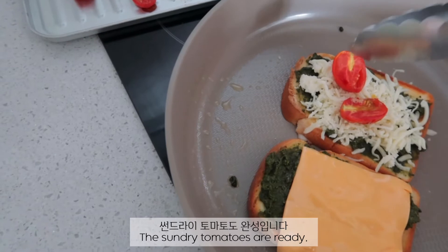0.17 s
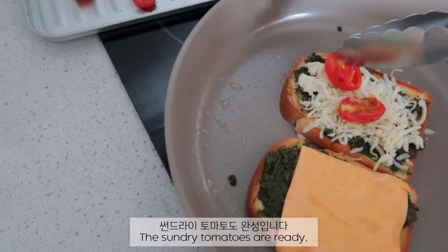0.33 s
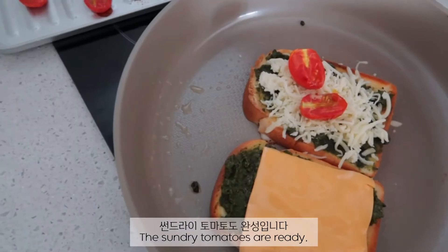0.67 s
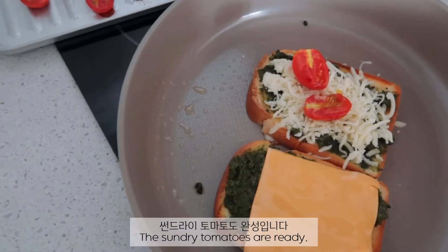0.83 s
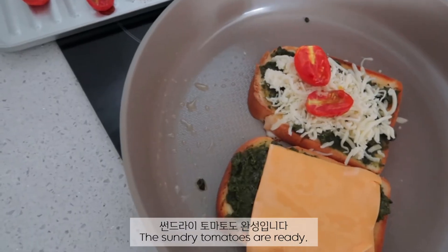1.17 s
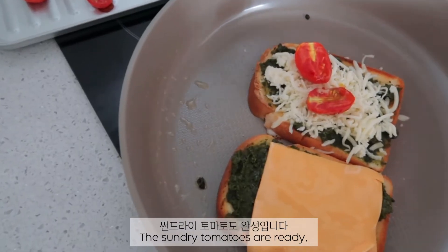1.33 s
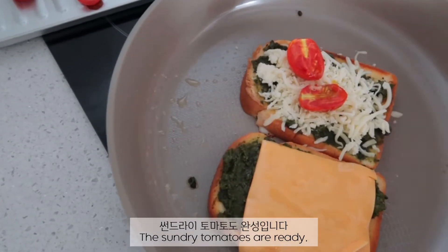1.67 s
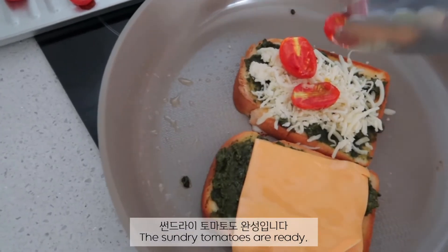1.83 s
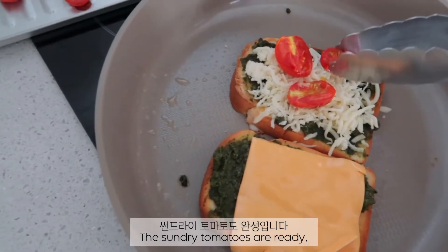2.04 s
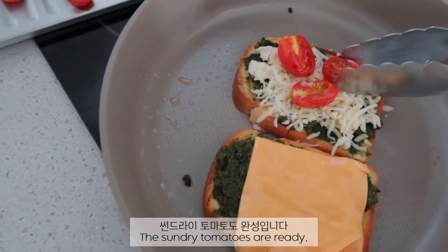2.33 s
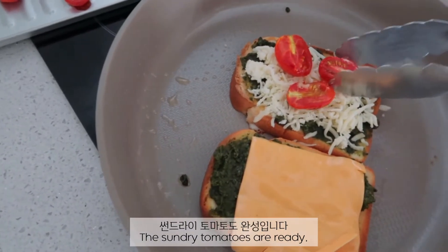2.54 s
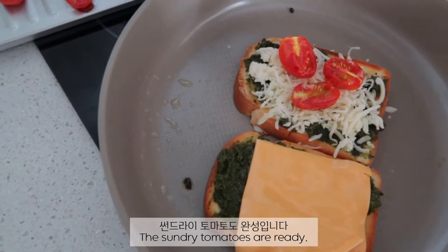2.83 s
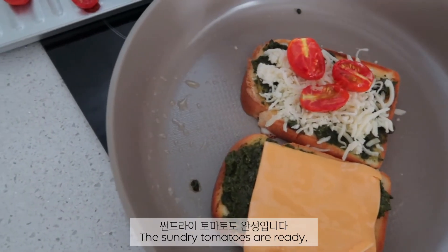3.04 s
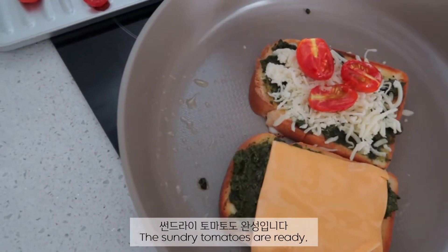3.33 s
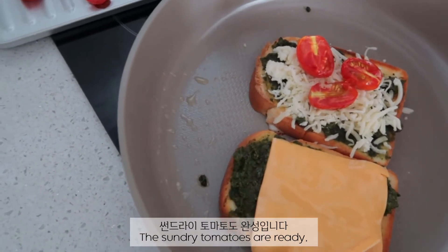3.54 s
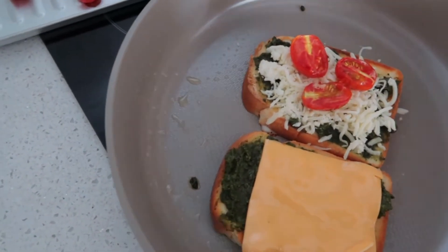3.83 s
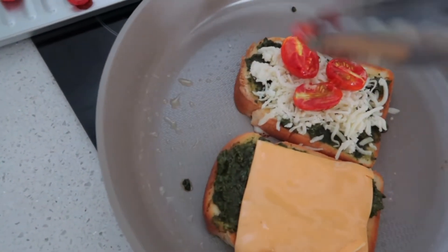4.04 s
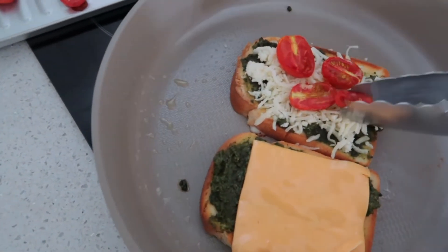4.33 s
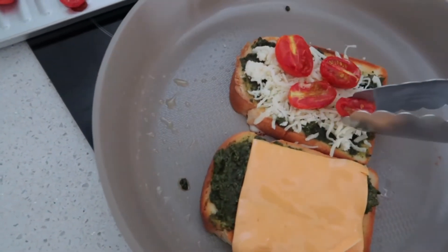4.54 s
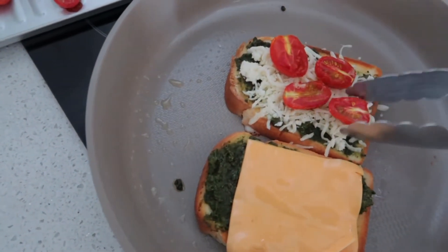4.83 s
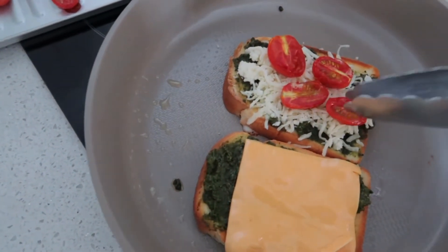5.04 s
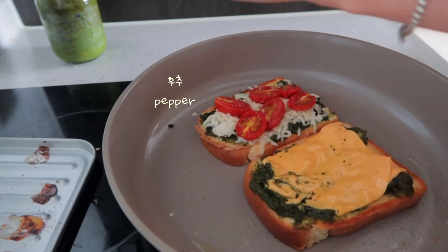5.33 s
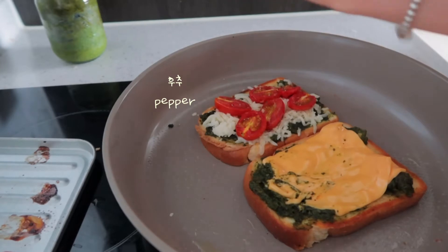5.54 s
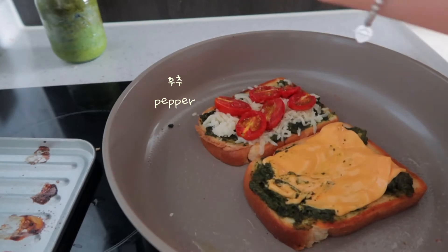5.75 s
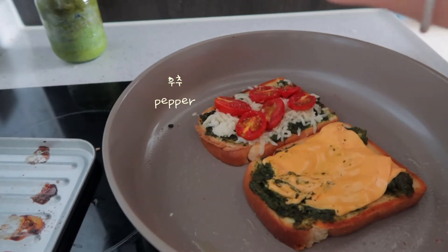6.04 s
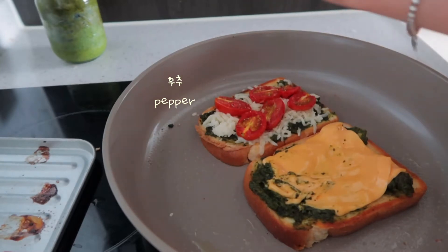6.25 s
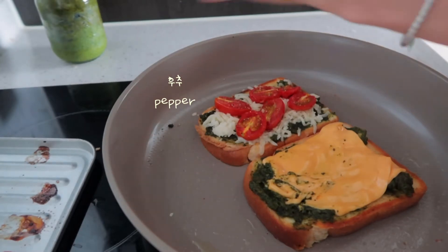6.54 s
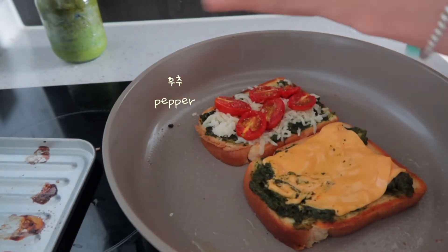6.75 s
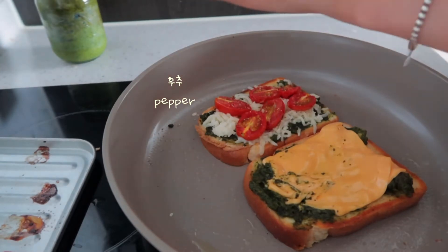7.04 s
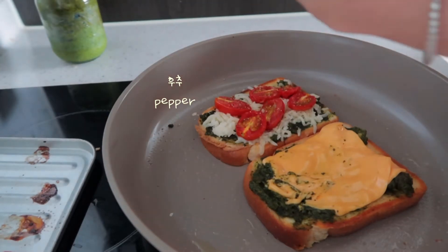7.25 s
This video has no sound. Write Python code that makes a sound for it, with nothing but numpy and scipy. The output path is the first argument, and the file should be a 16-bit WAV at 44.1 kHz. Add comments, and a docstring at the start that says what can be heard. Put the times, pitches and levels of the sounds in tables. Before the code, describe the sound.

Metal tongs clink twice in a quiet kitchen, then a hand pepper mill grinds in quick, crunchy twists over a low hum.

```python
"""Steel tongs and a pepper mill

Tongs knock and rattle a few times in a quiet kitchen, their arms ringing over the thud of a hollow tray.
Then a hand pepper mill twists to and fro, dragging dense grit through the burrs and cracking corns.
An appliance hums under the room tone. A close stereo pair hears the lows alike and the highs apart."""
import sys
import numpy as np
from scipy import signal
from scipy.fft import rfft, irfft
from scipy.io import wavfile
from scipy.ndimage import uniform_filter1d

SR = 44100
rng = np.random.default_rng(int(sys.argv[2]) if len(sys.argv) > 2 else 0)


def waveform_to_disk(signal):
    """Save audio, clipped to [-1, 1], as 16-bit WAV at the path in sys.argv[1]."""
    frames = np.transpose(np.atleast_2d(signal))
    scaled = np.clip(frames, -1, 1) * 32767
    samples = np.round(scaled).astype(np.int16)
    wavfile.write(sys.argv[1], SR, samples)


N = 325899

# room tone EQ: frequency_hz, gain_db
ROOM_TONE_EQ = [(20, -9.5), (45, 1.5), (75, -4.5), (130, -1.5), (200, -5), (300, -8), (500, -13.5),
                (800, -19), (1500, -23.5), (3000, -28), (6000, -35), (11000, -42), (13000, -46.5),
                (16000, -57)]
# side-channel EQ that widens the room tone: frequency_hz, gain_db
ROOM_TONE_SIDE_EQ = [(60, -40), (110, -16), (200, -6), (380, -0.5), (700, -1), (1290, 1), (2380, 0),
                     (4400, -1), (8120, -2.5), (15000, 5.5)]
# three splice clicks, each with a jump in the hum's phase: start_s, jump_cycles, click_db
SPLICES = [(.3927, .38, -33), (2.616, .4, -42), (5.126, .29, -38)]
# narrow wavering tones beside the hum: pitch_hz, width_hz, rms_db
HUM_TONES = [(35.8, 10, -63), (109.6, 15.4, -51.5), (170, 6.5, -54.5), (482.5, 6, -68.5), (503, 5, -80)]
# tong blows; snap, edge and thud are relative to the level: start_s, level_db, pitch_hz,
# rolloff_db_per_octave, contact_ms, snap_db, edge_db, thud_db, thud_pitch_hz
TONG_BLOWS = [(0.112, -22.5, 4000, 66, 1.7, -2, -40, 0.5, 490),
              (0.114, -37.5, 1250, 90, 2.9, -8, -34, 9, 684), (0.111, -45, 7130, 45, 2.8, 0, -30, -7, 398),
              (0.124, -46, 2900, 25, 2.6, 0, -34, 20, 396), (0.14, -45.5, 3500, 15, 2.3, 8, -34, 11, 675),
              (0.173, -50, 3000, 15, 2.6, 0, -34, 18, 500),
              (0.8209, -2.5, 2300, 23.5, 0.36, 4, -20, -18, 420),
              (0.821, -12, 6420, 40, 1, -10, -25, -31, 400), (0.822, -9, 3280, 44, 1, -8, -30, -28.5, 499),
              (0.823, -10.5, 4680, 27, 0.74, -3, -25, -30, 400),
              (0.8244, -11, 2900, 21, 0.92, 5, -32, -20, 393),
              (0.825, -5.5, 2080, 67, 1.5, -6, -35, -23, 390),
              (0.824, -2, 1710, 72, 2.7, -3.5, -36, -16.5, 400),
              (0.841, -12, 4680, 14, 2.1, -6, -13, -17, 393),
              (0.858, -20.5, 2300, 16, 2.5, 8, -17, -34, 390),
              (0.874, -29, 3000, 19, 4.7, 15, -13, -31, 390),
              (0.8993, -15.5, 2900, 55, 1.6, -5, -24, -40, 280),
              (0.902, -17, 2190, 45, 2.4, 4, -29, -38, 280),
              (0.916, -11, 1710, 52, 3.1, 0.5, -34, -22, 684),
              (0.921, -24, 5970, 35, 2.1, -3, -28, -34, 400), (0.93, -31, 6950, 40, 2.3, 0, -25, -30, 400),
              (0.92, -15.5, 2900, 45, 2.5, -4, -29, -38, 400), (0.903, -23, 3640, 60, 2, -3, -30, -27, 400),
              (0.922, -20, 3640, 60, 2.5, -5, -30, -30, 400),
              (0.948, -27.5, 2440, 31, 1.3, -2, -30, -12, 400), (0.961, -31, 2027, 40, 3, 1, -35, -20, 400),
              (1.0, -37, 2027, 35, 3.3, -5, -35, -15, 400),
              (0.933, -21.5, 1710, 30, 1.6, 4, -32, -12.5, 268),
              (1.051, -44, 5000, 19, 2.7, 9, -8, -13, 258), (1.175, -44, 1200, 16, 1, 5, -33, 8.5, 794),
              (3.012, -56.5, 1200, 20, 3, 0, -30, 18, 580), (3.052, -58, 1200, 20, 2.6, 0, -30, 18, 626),
              (3.166, -11.5, 1460, 25.5, 0.21, 5, -42, -23, 316),
              (3.1672, -22, 4680, 25, 0.54, 2, -28, -30, 390),
              (3.167, -16, 3500, 32, 0.6, 0, -33, -23, 390),
              (3.172, -16.5, 1810, 44, 0.67, -8, -42, -8.5, 377),
              (3.186, -23, 2720, 50, 2.2, 3, -35, -22, 390), (3.204, -22, 2710, 55, 2, 2, -41, -19, 400),
              (3.2, -31, 5950, 45, 2.5, 0, -35, -20, 400), (3.21, -18.5, 1770, 43, 2.7, -6, -46, -6.5, 414),
              (3.226, -26, 2745, 45, 1.6, -1, -42, -3, 403), (3.262, -24, 2720, 55, 2.3, -9, -37, -31, 300),
              (3.18, -17, 1810, 47, 1.7, -8, -42, -18, 390), (3.268, -15, 1805, 57, 3.2, -4, -47, -13, 282),
              (3.274, -30, 5950, 47, 2.5, 2, -35, -27, 400),
              (3.284, -20.5, 1250, 28, 0.59, -5, -47, -1.5, 644),
              (3.291, -23.5, 2810, 28, 0.77, -4, -40, -7, 282),
              (3.318, -31.5, 1070, 12, 1.3, -2, -43, -3, 385), (3.296, -28, 1810, 45, 2, -7, -40, -20, 390),
              (3.333, -38, 1850, 42, 1.2, -5, -40, -4, 390)]
# modes of the steel arms: pitch_hz, level_db, t60_s
TONG_MODES = [(1070, -1.5, 0.098), (1250, -5, 0.054), (1390, -6, 0.062), (1560, 0, 0.026),
              (1710, -3.5, 0.063), (1787, -1, 0.031), (1794, -25, 0.044), (1810, -4.5, 0.041),
              (1900, -12, 0.0499), (2027, -8.5, 0.076), (2094, -2.5, 0.082), (2198, -3.5, 0.037),
              (2422, -9, 0.064), (2560, -14, 0.034), (2720, -7.5, 0.051), (2810, -2, 0.02),
              (2900, -9.5, 0.065), (2954, -7.5, 0.035), (3280, -6.5, 0.043), (3575, -9.5, 0.047),
              (4000, -12, 0.054), (4300, -14, 0.04), (4680, -17, 0.045), (4710, -9, 0.04),
              (5200, -10, 0.057), (5950, -11, 0.05), (6420, -10, 0.028), (6950, -22, 0.05),
              (7030, -18, 0.05), (7960, -34, 0.04)]
# modes of the hollow tray under the tongs: pitch_hz, level_db, t60_s
TRAY_MODES = [(277.3, -2.5, 0.19), (333, 6, 0.042), (390, -3.5, 0.13), (487, -0.5, 0.039),
              (524, -12.5, 0.16), (580, -8, 0.078), (678, -9.5, 0.088), (848, -3, 0.051)]
# EQ of steel snapping on steel: frequency_hz, gain_db
SNAP_EQ = [(88, -67), (150, -18), (354, -15), (550, -14), (800, -14.5), (1100, -10.5), (1500, -9),
           (1680, -7), (2050, -26), (2300, -10.5), (3300, -17), (6000, -23), (10000, -31.5), (13300, -37),
           (15900, -51)]
# side-channel EQ of the reflections around tongs and mill: frequency_hz, gain_db
REFLECTION_SIDE_EQ = [(60, -41), (110, -20.5), (200, -21), (380, -24), (700, -22), (1290, -22), (2380, -14),
                      (4400, -6), (8120, 0), (15000, 4.5)]
# first row: a faint hiss steps up at the last splice, just before the grinding;
# other rows: twists of the mill, the grip damping its body: start_s, length_s, grit_db, swell_db,
# trickle_db, brightness_db, lowest_modes_db, low_modes_db, middle_modes_db, high_modes_db
GRIT_CUES = [(5.129, 0.02, -52, 3, -50, -10, -8, -4, -5, -11),
             (5.156, 0.046, -29.5, 3, -59.5, -24, -1, -4, -2.5, -2),
             (5.336, 0.092, -22, -11.5, -55.5, -14, -4, -36, -4, -4.5),
             (5.544, 0.072, -34, 4.5, -59, -19.5, 1.5, -7, -2.5, 3.5),
             (5.731, 0.079, -28.5, -5, -52.5, -12, -15, -21, -4, 5.5),
             (5.936, 0.1, -37.5, 9, -69, -22, -2.5, -9, -16, -1),
             (6.138, 0.072, -30.5, 0, -59.5, -13, -10, -3, 0, 0.5),
             (6.358, 0.078, -44.5, 17.5, -48.5, -16.5, 3, -1, -12, -2.5),
             (6.562, 0.063, -28, 5.5, -48, -13, -19, -22, -3, -10),
             (6.77, 0.083, -26, 0.5, -51.5, -19.5, -5.5, -3, -13, -6.5),
             (6.98, 0.13, -24, -18.5, -49, -14.5, -16, -29, -7, 0.5),
             (7.171, 0.076, -35, 2.5, -50.5, -18.5, 2.5, -0.5, -0.5, 1.5),
             (7.362, 0.048, -27, -3, -52, -7, 3, -6, 1, 5)]
# peppercorns cracking; snap is relative to the level: start_s, level_db, pitch_hz, snap_db
CORN_CRACKS = [(5.1547, -16.5, 1670, -5.5), (5.157, -16, 6200, -10), (5.173, -17, 1980, 0),
               (5.176, -16.5, 2650, -4), (5.19, -20, 1590, -6), (5.211, -14, 1580, -7),
               (5.224, -12, 4400, -20), (5.223, -13.5, 1590, -12), (5.33, -11, 4120, 3),
               (5.3315, -18.5, 4300, -8), (5.345, -12.5, 1590, -24), (5.3494, -11.5, 4300, -17),
               (5.34, -15, 4000, -10), (5.361, -13, 4200, -13), (5.371, -16, 4000, -13),
               (5.3891, -14, 3860, -4), (5.412, -19.5, 2980, -12), (5.451, -23, 4000, 0),
               (5.537, -26.5, 4090, -2), (5.547, -28, 4120, 2), (5.5626, -25, 4400, 2),
               (5.596, -15.5, 1590, -7), (5.58, -20, 4400, -2), (5.602, -20, 1510, 4),
               (5.61, -12, 1530, -17), (5.611, -24, 4400, -13), (5.621, -16.5, 1510, -9),
               (5.6298, -20, 4030, -9), (5.712, -34, 2000, 1), (5.728, -18.5, 4000, -0.5),
               (5.73, -16, 1590, -6), (5.7488, -13, 1590, 2.5), (5.762, -13, 3240, -3),
               (5.7748, -11, 3250, 0), (5.776, -20, 6400, -12), (5.7886, -17, 3860, 2.5),
               (5.811, -12, 3550, 3.5), (5.812, -17, 6300, -17), (5.835, -35, 6400, -5),
               (5.932, -30.5, 3860, -3), (5.943, -23.5, 1550, -8), (5.9698, -20.5, 1900, -20),
               (5.987, -18.5, 1660, 3), (6.115, -32.5, 4040, -2), (6.1403, -15, 1390, -18),
               (6.154, -17, 3860, -14), (6.178, -22, 2910, -8), (6.1959, -17.5, 3540, 3),
               (6.201, -16, 3250, -4), (6.202, -19, 2000, -7), (6.224, -28, 2900, 8), (6.346, -34, 4400, 3),
               (6.358, -27, 2650, -14), (6.382, -23, 1960, -15), (6.4095, -16, 1830, -2),
               (6.419, -22, 3860, 5), (6.4248, -15, 1590, 6), (6.43, -17.5, 4120, 4),
               (6.566, -27, 2750, -2), (6.575, -14.5, 4260, 3), (6.5834, -18.5, 2010, 8.5),
               (6.591, -8, 2930, -0.5), (6.5926, -12, 3860, -7), (6.599, -17, 2900, -3),
               (6.61, -10.5, 2500, 2), (6.613, -11.5, 3860, -7), (6.615, -11, 3860, -12),
               (6.627, -20, 2250, -18), (6.759, -24.5, 1900, 0), (6.7784, -12.5, 2250, 2),
               (6.78, -2, 2580, -7), (6.783, -14.5, 4300, -9), (6.811, -29, 1950, -14),
               (6.8445, -27, 1650, 11), (6.863, -18.5, 1590, 2.5), (6.864, -22, 4360, -8),
               (6.9601, -26, 4400, 6), (6.969, -12, 1250, 2.5), (6.971, -19, 3540, -8),
               (6.986, -11, 2900, 4), (6.9861, -0.5, 3990, -7), (6.986, -11, 4460, -16),
               (6.9925, -15, 1990, -9), (7.0175, -15, 1970, -25), (7.05, -24, 2900, 0),
               (7.085, -32, 3250, -3), (7.152, -25.5, 2090, 1), (7.154, -27, 2900, -8),
               (7.1774, -15.5, 1730, -7.5), (7.232, -28, 1590, -4), (7.233, -28, 5000, -8),
               (7.244, -18, 4400, -12), (7.279, -24.5, 2250, 2.5), (7.28, -26, 4400, -6),
               (7.3588, -13.5, 2900, 2), (7.364, -11, 3540, -1), (7.373, -13, 2650, 2.5),
               (7.3814, -15, 1940, -4)]
# modes of the mill body: pitch_hz, level_db, t60_s
MILL_MODES = [(1095, -14.5, 0.036), (1250, -19, 0.049), (1468, -1, 0.043), (1590, -3, 0.04),
              (1696, -7.5, 0.046), (1934, 6.5, 0.016), (1970, -3, 0.062), (2250, -1.5, 0.041),
              (2450, -5, 0.028), (2650, -2, 0.027), (2910, -2.5, 0.037), (3250, -3.5, 0.049),
              (3540, -9, 0.038), (3833, 1.5, 0.0098), (3860, -4, 0.041), (4120, -3, 0.033),
              (4280, -14, 0.012), (4360, -1.5, 0.039), (4400, -2.5, 0.014), (4690, -3, 0.04),
              (5000, -6, 0.021), (5250, -10, 0.025), (6200, -11, 0.026), (6730, -16, 0.026)]
# EQ of the dry crackle in the burrs: frequency_hz, gain_db
CRACKLE_EQ = [(240, -50), (400, -39), (467, -31.5), (655, -23), (800, -20.5), (1270, -15), (1550, -8.5),
              (1750, -6), (3450, -10), (3910, -7), (5480, -14), (12400, -20), (14200, -28.5), (15900, -56)]


def amp(db):
    """Linear gain of a dB value."""
    return 10 ** (np.asarray(db) / 20)


def rms_one(x):
    """Normalise to rms 1."""
    return x / np.sqrt(np.mean(x ** 2) + 1e-30)


def convolve(x, response):
    """Causal convolution, trimmed to the scene."""
    return signal.fftconvolve(x, response)[:N]


def butterworth(x, order, hz, kind="low"):
    """Low-pass or high-pass filter."""
    return signal.sosfilt(signal.butter(order, hz, kind, fs=SR, output="sos"), x)


def eq(x, curve, size=8192):
    """Minimum-phase EQ: no pre-ring ahead of a transient."""
    hz, db = np.transpose(curve)
    grid_hz = np.maximum(np.arange(size // 2 + 1) * SR / size, 1)
    gain = amp(np.interp(np.log(grid_hz), np.log(hz), db))
    cepstrum = irfft(np.log(gain))
    cepstrum[1:size // 2] *= 2
    return convolve(x, irfft(np.exp(rfft(cepstrum[:size // 2 + 1], size))))


def drift(hz):
    """Smooth random modulation of rms 1, drawn every 32nd sample."""
    pole = np.exp(-64 * np.pi * hz / SR)
    noise = rng.standard_normal(N // 32 + 1402)
    slow = signal.lfilter([1], [1, -2 * pole, pole * pole], noise)[1400:]
    return np.interp(np.arange(N) / 32, np.arange(len(slow)), rms_one(slow))


def ring(clicks, hz, t60):
    """Resonator: a unit click starts a decaying sine of height 1."""
    radius, angle = amp(-60 / (t60 * SR)), 2 * np.pi * hz / SR
    return signal.lfilter([0, np.sin(angle)], [1, -2 * radius * np.cos(angle), radius ** 2], clicks + 1e-18)


def contacts(start_s, level_db, contact_ms, hz=None):
    """Each hit swells and fades with its contact time: its power, or the part of its push at hz."""
    width = np.clip(contact_ms + 0 * start_s, .03, 4)[:, None] * SR / 1000
    lag = np.arange(int(7 * width.max()))
    push = lag / width * np.exp(-np.minimum(lag / width, 40))
    push *= (amp(level_db) ** (1 if hz else 2) / np.sum(push, axis=1))[:, None]
    if hz:
        push *= 2 * np.cos(2 * np.pi * (hz * lag / SR + rng.random(len(start_s))[:, None]))
    at = np.round(start_s * SR).astype(int)[:, None] + lag
    return np.bincount(at.ravel(), push.ravel(), N)[:N]


def envelope(start_s, level_db, contact_ms, t60):
    """Power builds through each contact, then decays."""
    power = contacts(start_s, level_db, contact_ms)
    return np.sqrt(signal.lfilter([1], [1, -amp(-120 / (t60 * SR))], power + 1e-18))


def bursts(start_s, level_db, contact_ms, t60):
    """A decaying noise burst on each hit."""
    return envelope(start_s, level_db, contact_ms, t60) * rng.standard_normal(N)


def struck(start_s, level_db, pitch_hz, contact_ms, modes, db_per_octave, scatter_db):
    """Each hit rings the modes near its pitch hardest, rolling off to either side."""
    scatter = scatter_db * rng.standard_normal((len(start_s), len(modes)))
    out = np.zeros(N)
    for k, (hz, db, t60) in enumerate(modes):
        drive_db = level_db + db + scatter[:, k] - db_per_octave * np.abs(np.log2(hz / pitch_hz))
        out += ring(contacts(start_s, drive_db, contact_ms, hz), hz, t60)
    return out


def grains(per_s, spread_db):
    """Random clicks of uneven size and polarity."""
    sizes = amp(spread_db * np.minimum(rng.exponential(1, N), 5)) * rng.choice([-1, 1], N)
    return sizes * (rng.random(N) < per_s / SR)


def shaken(clicks, modes):
    """Each click rings one random mode of a body; rms 1."""
    dealt = rng.integers(0, len(modes), N)
    rings = (amp(db) * ring(clicks * (dealt == k), hz, t60) for k, (hz, db, t60) in enumerate(modes))
    return rms_one(sum(rings))


def room_tone(mid_db=-50):
    """A bed of smooth noise, mono in the bass and wide above."""
    mid = eq(rng.standard_normal(N), ROOM_TONE_EQ)
    side = eq(eq(rng.standard_normal(N), ROOM_TONE_EQ), ROOM_TONE_SIDE_EQ)
    return amp(mid_db) / np.std(mid) * (mid + side * [[1], [-1]])


def appliance_hum(pitch_hz=58.7, rms_db=-39):
    """A steady low sine with narrow noise tones beside it; each splice adds a click and a phase jump."""
    t = np.arange(N) / SR
    jumps = sum(jump * np.clip((t - start_s) / .004, 0, 1) for start_s, jump, _ in SPLICES)
    cycles = pitch_hz * t + rng.random() - jumps
    hum = amp(rms_db + 0.88 * drift(4.6)) * np.sqrt(2) * np.sin(2 * np.pi * cycles)
    for start_s, _, click_db in SPLICES:   # a step that sinks back within a few ms
        hum -= amp(click_db) * (t >= start_s) * np.exp(-np.abs(t - start_s) / 0.00095)
    for hz, width_hz, db in HUM_TONES:
        hum += amp(db) * rms_one(ring(rng.standard_normal(N), hz, t60=np.log(1000) / np.pi / width_hz))
    return hum


def tongs():
    """Blows ring the steel arms, snap and thud into the tray; the loose arms rattle on, then settle."""
    start_s, level_db, pitch_hz, rolloff, contact_ms, *layers = np.transpose(TONG_BLOWS)
    snap_db, edge_db, thud_db, thud_hz = layers
    arms = amp(-5) * struck(start_s, level_db, pitch_hz, contact_ms, TONG_MODES, rolloff, scatter_db=1.5)
    thuds = struck(start_s, level_db + thud_db, thud_hz, contact_ms, TRAY_MODES, 37.5, scatter_db=0)
    snaps = eq(bursts(start_s, level_db + snap_db, contact_ms, t60=0.082), SNAP_EQ)
    edges = butterworth(bursts(start_s, level_db + edge_db, contact_ms / 2, t60=0.031), 2, 5000, "high")
    touches = grains(per_s=5000, spread_db=0.62)
    rattle = shaken(touches, TONG_MODES) + amp(-1.5) * rms_one(eq(touches, SNAP_EQ))
    loose = envelope(start_s, level_db - 28, contact_ms=2.3, t60=0.12)
    settling = envelope(start_s, level_db - 49, contact_ms=5, t60=0.64)
    return arms + thuds + snaps + edges + (loose + settling) * rattle


def tail(t60):
    """Reverb tail: decaying noise of unit energy."""
    t = np.arange(SR // 2) / SR
    response = rng.standard_normal(len(t)) * amp(-60 * t / t60)
    return response / np.sqrt(np.sum(response ** 2))


def kitchen(dry, room_t60_s=0.2, early_t60_s=0.017, hand_moves_hz=8.4):
    """A short, dark reverb; reflections are widest in the treble and shift as the hands move."""
    dark = butterworth(dry, 1, 5000)
    reverb = amp(-11) * convolve(dark, tail(room_t60_s))
    blend = np.pi * drift(hand_moves_hz)
    early = sum(convolve(dry * fade, tail(early_t60_s)) for fade in (np.cos(blend), np.sin(blend)))
    late = amp(-6) * convolve(dark, tail(room_t60_s))
    return dry + reverb + eq(early + late, REFLECTION_SIDE_EQ) * [[1], [-1]]


def grit_levels(release_db_per_s, attack_db_per_s=1500, lead_s=0.027):
    """Each cue rises, swells or sags, and dies away: its level, the trickle level and the cue index."""
    t, cues = np.arange(N) / SR, np.array(GRIT_CUES)
    cue = np.maximum(np.searchsorted(cues[:, 0] - lead_s, t) - 1, 0)
    start_s, length_s, grit_db, swell_db = cues[cue, :4].T
    level_db = grit_db + swell_db * np.clip((t - start_s) / length_s, 0, 1)
    level_db -= attack_db_per_s * np.maximum(start_s - t, 0)
    level_db -= release_db_per_s * np.maximum(t - start_s - length_s, 0)
    trickle_db = np.append(-200, cues[:, 4])[np.searchsorted(cues[:, 0], t)]
    return np.maximum(level_db, -200), trickle_db, cue


def flicker(x, depth_db=3, rate_hz=13.3):
    """Five bands swell and sink independently."""
    lows = [0 * x] + [butterworth(x, 2, hz) for hz in (2750, 5200, 7500, 10200)] + [x]
    return sum(amp(depth_db * drift(rate_hz)) * (high - low) for low, high in zip(lows, lows[1:]))


def grinding(debris):
    """Clumps of grit and corn debris pass the burrs, shaking the gripped body and crackling dryly."""
    grit = grains(per_s=2500 * amp(3 * drift(40)), spread_db=2)
    grit_db, trickle_db, cue = grit_levels(release_db_per_s=404)
    dust_db = grit_levels(release_db_per_s=267)[0]   # the crackle outlasts the body
    bright_db, *grip_db = uniform_filter1d(np.array(GRIT_CUES)[cue, 5:], size=400, axis=0).T
    bands = MILL_MODES[:5], MILL_MODES[5:8], MILL_MODES[8:12], MILL_MODES[12:]
    # the damping of the fingers wanders within a twist
    body = sum(amp(db - 12 + 1.5 * drift(12.7)) * shaken(grit, band) for db, band in zip(grip_db, bands))
    body_gain = np.hypot(amp(np.maximum(grit_db, trickle_db)), debris)
    dust = amp(-4) * grains(per_s=7000, spread_db=0.88)
    crackle = rms_one(flicker(eq(grit + dust, CRACKLE_EQ)))
    dust_gain = np.hypot(amp(dust_db), debris) * amp(bright_db + 6)
    crackle_gain = np.hypot(dust_gain, amp(trickle_db - 1))   # the trickle is mostly dry dust
    return body_gain * body + crackle_gain * crackle


def pepper_mill():
    """Over the grinding, corns split with a tick and a snap, ring the body and shed debris."""
    start_s, level_db, pitch_hz, snap_db = np.transpose(CORN_CRACKS)
    # harder and snappier cracks have shorter contacts
    contact_ms = 0.48 * amp(-0.5 * (level_db - np.mean(level_db) + snap_db))
    grind = grinding(debris=envelope(start_s, level_db - 14.5, contact_ms, t60=0.12))
    knocks = struck(start_s, level_db, pitch_hz, contact_ms, MILL_MODES, db_per_octave=43.5, scatter_db=1)
    ticks = bursts(start_s, level_db + snap_db + 3.5, contact_ms / 4, t60=0.0058)
    snaps = bursts(start_s, level_db + snap_db, contact_ms, t60=0.053)
    return grind + amp(-8.5) * knocks + eq(ticks + snaps, CRACKLE_EQ)


def scene():
    """Tongs and mill in the kitchen reverb, over a bed of hum and room tone."""
    return kitchen(tongs() + pepper_mill()) + appliance_hum() + room_tone()


def record(dry):
    """A steep high cut at 15.8 kHz."""
    return signal.sosfilt(signal.ellip(10, .5, 70, 15800, fs=SR, output="sos"), dry)


dry = scene()
out = record(dry)
waveform_to_disk(out)
```